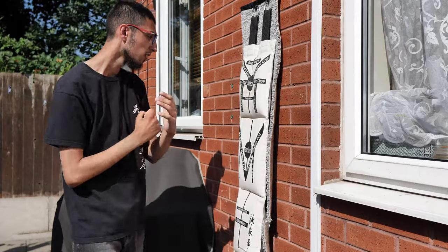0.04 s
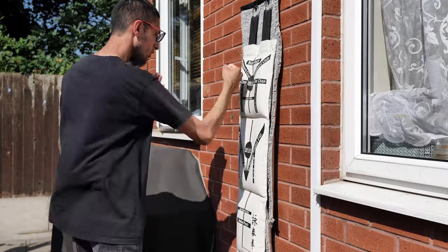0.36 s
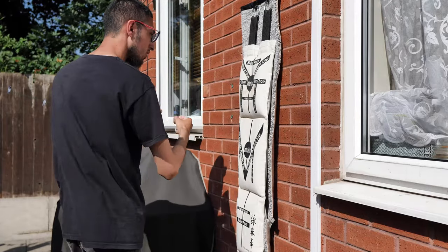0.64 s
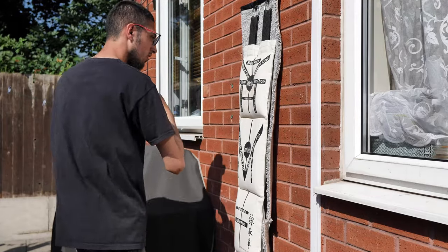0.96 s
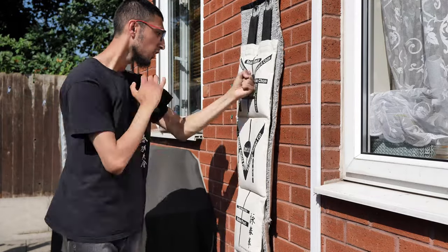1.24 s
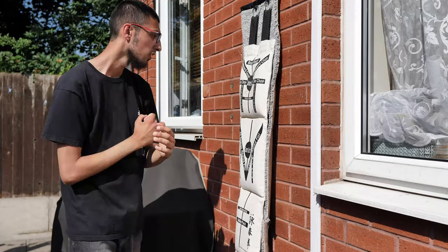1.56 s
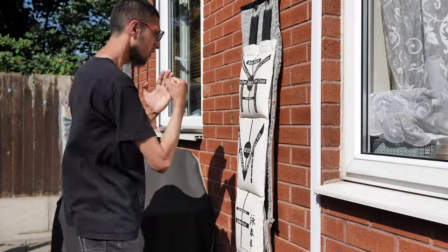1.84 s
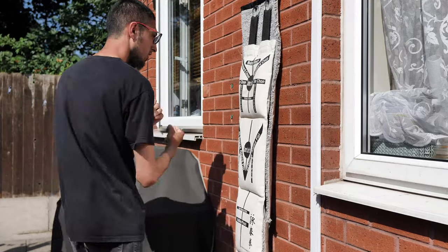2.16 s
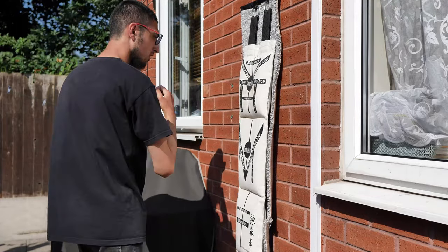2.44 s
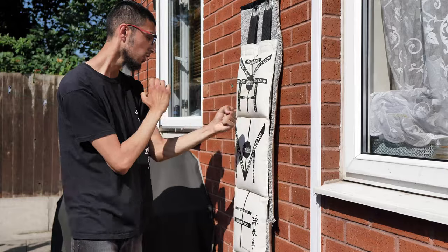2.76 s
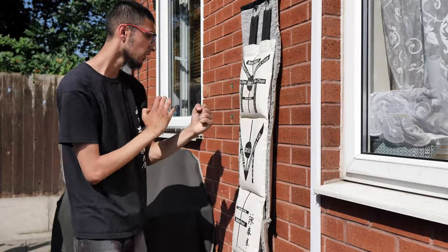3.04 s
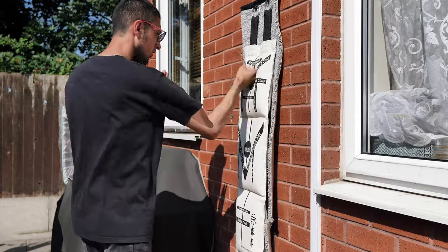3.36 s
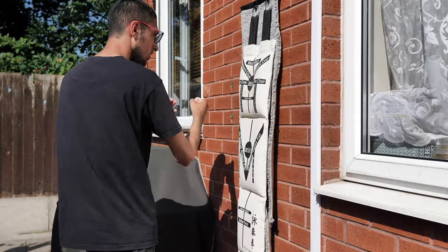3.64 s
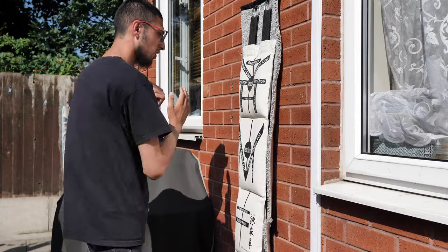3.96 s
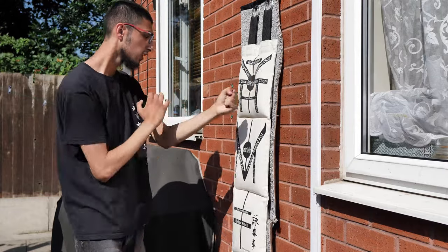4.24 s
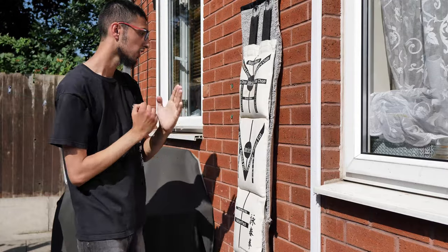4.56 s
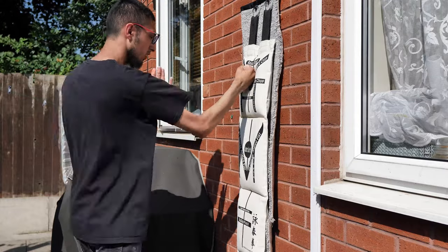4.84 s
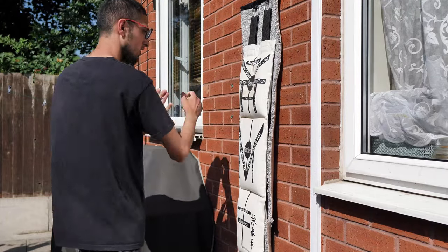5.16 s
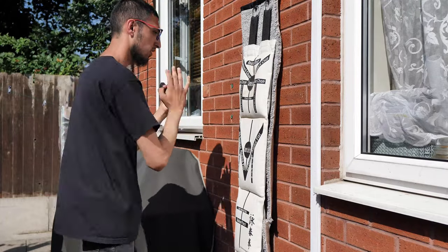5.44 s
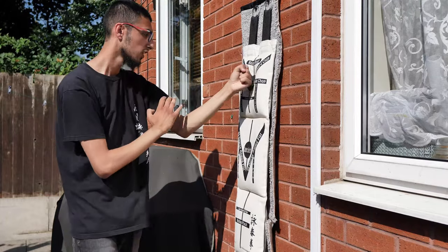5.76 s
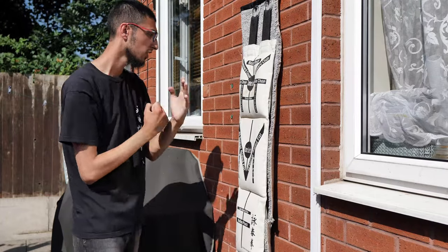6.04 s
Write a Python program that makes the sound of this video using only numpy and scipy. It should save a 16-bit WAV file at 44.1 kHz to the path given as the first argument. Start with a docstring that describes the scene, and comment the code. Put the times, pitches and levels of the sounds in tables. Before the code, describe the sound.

Eight steady, crunchy knocks of fists on a canvas bag against a brick wall, cloth swishing, over a far traffic murmur.

```python
"""A back yard: bare fists land eight slow, even punches on a sand-filled canvas bag fixed to a brick wall.
A sleeve swishes ahead of each blow; the bag knocks, its filling crunches and settles,
the wall booms and the yard answers with dull echoes. Far traffic murmurs throughout,
and its tyre hiss grows towards the end as one car draws near."""
import sys
import numpy as np
from scipy import signal
from scipy.fft import rfft, irfft
from scipy.io import wavfile
from scipy.ndimage import uniform_filter1d

SR = 44100
rng = np.random.default_rng(int(sys.argv[2]) if len(sys.argv) > 2 else 0)


def master_out(mix):
    """Clip the mix to full scale and print it as 16-bit PCM to the path in sys.argv[1]."""
    frames = np.transpose(np.atleast_2d(mix))
    ceiling = np.clip(frames, -1, 1)
    pcm = np.round(ceiling * 32767).astype(np.int16)
    wavfile.write(sys.argv[1], SR, pcm)


N = 273420
TIME = np.arange(N) / SR

# Each fist finds the filling packed differently, which retunes the bag; its upper two resonances
# follow the tautness of the canvas. Each row: impact in seconds; pitch ratios of thud, knock and canvas;
# relative levels in dB of thud, knock, clop, slap, crunch and wall; swing length in seconds;
# swing and pull-back levels in dB.
PUNCHES = [(0.498, 0.95, 1.01, 0.99, -13, -12.5, -43, -19, -11.5, 1.5, .13, -30.5, -43),
           (1.3119, 1.1, 1.05, 1, -13, -8.5, -11.5, -11.5, -14.5, -11, 0.13, -32.5, -55),
           (2.0277, 0.76, 1.05, 1.1, -16.5, -13.5, -20, -11, -14, 0, .11, -30, -38),
           (2.7469, .72, 1.04, 1.12, -17.5, -10.5, -13.5, -16, -14, 3, 0.12, -33.5, -49),
           (3.4671, 1.05, 1.15, 0.921, -11, -10.5, -8, -21, -13.5, 3.5, 0.097, -33.5, -59),
           (4.1999, 0.63, 0.77, 0.975, -16, -17, -20, -12.5, -14, -0.5, 0.15, -33.5, -46.5),
           (4.921, 1.07, 0.98, 0.95, -15.5, -12.5, -16.5, -12, -13, -4, 0.15, -34, -51),
           (5.648, 1.05, 0.93, 0.939, -13, -21, -18.5, -16, -14.5, -5, 0.15, -30.5, -59)]
# Stereo image of close and of distant sounds. Each row: frequency in Hz, left-right likeness (1 is mono).
NEAR_LIKENESS = [(100, 1), (400, 0.99), (1000, 0.91), (3000, 0.84), (8000, 0.89), (13000, 0.68)]
FAR_LIKENESS = [(100, 1), (400, 0.99), (1000, 0.8), (3000, 0.6), (8000, 0.79), (13000, 0.29)]


def bag_knocks():
    """The padding spreads the blow: each resonance swells for a few ms and the sand damps it at once."""
    # Thud, knock, clop and slap. Each row: base pitch in Hz, rise in seconds, delay in seconds.
    resonances = [(266, 0.0026, 0.00048), (430, 0.0023, 0.00071), (762, 0.0021, 0.00084),
                  (1179, 0.0031, 0.0012)]
    out, t = np.zeros(N), TIME[:SR // 10]
    for impact, thud, knock, canvas, *levels_db in PUNCHES:
        tuning = (thud, knock, canvas, canvas)
        for k, (hz, rise, delay) in enumerate(resonances):
            pulse = t / rise * np.exp(1 - t / rise)
            tone = pulse * np.sin(2 * np.pi * hz * tuning[k] * t)
            out += placed(impact + delay, (-1) ** k * from_db(levels_db[k]) * tone)
    return out


def crunch(gain_db, grain_db, lead_s):
    """Knuckles sink in and stop, crushing canvas and sand in one dense, gritty crack."""
    # Colour of the crack. Each row: frequency in Hz, relative level in dB.
    colour = [(100, -16), (250, -6), (600, -5), (1000, 0), (1550, 2), (2200, -8.5), (3200, -10.5),
              (5000, -13), (7000, -22), (9000, -15), (12000, -29.5), (16000, -39)]
    force = 0
    for impact, *_, crunch_db, _wall_db, _swing_s, _swing_db, _back_db in PUNCHES:
        crush = envelope(impact - lead_s, attack_s=0.0041, hold_s=0.0021, t60=0.019)
        force += from_db(crunch_db + gain_db) * crush
    return force * uneven(grain_db, size=20) * noise(colour, NEAR_LIKENESS)


def wall_boom(lag_s, blow_db, rebound_s, rebound_db):
    """The wall booms under the blow and again as the bag drops back against it."""
    # The wall's low modes. Each row: pitch in Hz, relative level in dB, time to fall 60 dB in seconds.
    modes = [(84.8, -53.5, 0.93), (122.2, -33.5, 0.28), (142, -30.5, 0.092), (209, -40.5, 0.2)]
    t = TIME[:SR]
    ring = sum(from_db(db - 60 * t / t60) * np.sin(2 * np.pi * hz * t) for hz, db, t60 in modes)
    boom = ring * np.minimum(t / 0.0082, 1)
    double_boom = placed(lag_s, from_db(blow_db) * boom) + placed(rebound_s, from_db(rebound_db) * boom)
    return sum(placed(impact, from_db(wall_db) * double_boom)
               for impact, *_, wall_db, _swing_s, _swing_db, _back_db in PUNCHES)


def settling_sand(gain_db, grain_db, lag_s):
    """Grains slide back in small clumps as the fist pulls out."""
    # Colour of the sliding filling. Each row: frequency in Hz, relative level in dB.
    colour = [(41, -42), (70, -12), (124, 0.5), (286, -6), (368, 1), (554, -2.5), (711, -1.5), (797, -5),
              (1000, -4), (1410, -14.5), (1810, -17), (2600, -16.5), (9490, -34.5), (12500, -54),
              (16000, -64)]
    flow = sum(envelope(impact + lag_s, attack_s=0.0032, hold_s=0.0034, t60=0.34)
               for impact, *_ in PUNCHES)
    return from_db(gain_db) * flow * uneven(grain_db, size=60) * noise(colour, NEAR_LIKENESS)


def sleeve(press_db, flutter_db, growth_db_per_s):
    """Cloth swishes up as the arm gains speed, rubs as the fist presses in and swishes on the way back."""
    # Colour of the swish. Each row: frequency in Hz, relative level in dB.
    colour = [(150, -20.5), (500, -9.5), (1000, -5), (1480, 1.5), (1950, -4), (2500, -4), (3500, -11),
              (6000, -18.5), (8000, -20.5), (9600, -19), (12000, -25), (16000, -36)]
    attack_s, follow_through_s, pull_back_lag_s = 0.04, 0.048, 0.15
    power = 0
    for impact, *_, swing_s, swing_db, back_db in PUNCHES:
        level_db = np.where(TIME < impact, swing_db + growth_db_per_s * (TIME - impact), press_db)
        hold_s = swing_s - attack_s + follow_through_s
        stroke = from_db(level_db) * envelope(impact - swing_s, attack_s, hold_s, t60=0.28)
        pull_back = from_db(back_db) * swell(impact + pull_back_lag_s, width_s=0.046)
        power += stroke ** 2 + pull_back ** 2
    return np.sqrt(power) * uneven(flutter_db, size=300) * noise(colour, NEAR_LIKENESS)


def canvas_release(level_db, delay_s, width_s):
    """The dented canvas springs back with a bright rasp as the fist leaves."""
    # Colour of the rasp. Each row: frequency in Hz, relative level in dB.
    colour = [(500, -20), (2500, 2), (9500, -4), (16000, -26)]
    release = sum(swell(impact + delay_s, width_s) for impact, *_ in PUNCHES)
    return from_db(level_db) * release * noise(colour, NEAR_LIKENESS)


def cloth_ticks(t60, width_ratio):
    """Fabric gives tiny bright snaps between blows."""
    # Each row: start in seconds, level before filtering in dB, band centre in Hz.
    snaps = [(1.664, -45, 8900), (3.099, -40, 6300), (3.667, -38.5, 8900), (4.318, -37, 9500),
             (5.846, -40, 6000)]
    out, t = np.zeros((2, N)), TIME[:SR // 10]
    for start, db, hz in snaps:
        snap = from_db(db - 60 * t / t60) * rng.standard_normal(len(t))
        out += placed(start, band(snap, hz / width_ratio, hz * width_ratio))
    return out


def yard_echoes(blows, high_cut_hz, tail_db, tail_t60):
    """The yard throws back a few dull echoes, then a faint diffuse tail."""
    # Bounces off fence, ground and house. Each row: delay in seconds, level in dB.
    echoes = [(.0075, -24.5), (0.018, -18), (.036, -22), (.052, -17.5), (0.063, -39.5)]
    dull = band(blows.mean(axis=0), 62, high_cut_hz)
    out = np.zeros((2, N))
    for delay, db in echoes:
        skew_s = rng.uniform(-0.00013, 0.00006)   # nudges the echo to one side
        out += from_db(db) * np.array([placed(delay - skew_s, dull), placed(delay + skew_s, dull)])
    t = TIME[:SR]
    white = noise([(100, 0), (16000, 0)], FAR_LIKENESS)[:, :SR]
    tail = white * from_db(-60 * t / tail_t60) * np.minimum(t / 0.018, 1)
    tail /= np.sqrt(np.sum(tail[0] ** 2))
    return out + from_db(tail_db) * signal.fftconvolve(dull[None], tail, axes=1)[:, :N]


def traffic_murmur(start_db, growth_db_per_s, engine_width_hz):
    """Far roads murmur and slowly thicken; three engines swell out of them."""
    # Colour of the murmur. Each row: frequency in Hz, relative level in dB.
    colour = [(15, -80), (25, -50), (53, -31), (62, -34), (75, -7.5), (200, -4.5), (243, -5), (278, -3),
              (386, 0), (450, -3), (567, -2.5), (662, -8), (850, -6.5), (1540, -12), (2500, -22),
              (3250, -72), (5500, -120)]
    # Far engines. Each row: peak in seconds, pitch in Hz, level in dB, swell width in seconds.
    engines = [(3.92, 477, -49, 0.21), (5.2, 405.4, -50.5, 0.42), (5.88, 382, -47.5, 0.16)]
    murmur = from_db(start_db + growth_db_per_s * TIME) * noise(colour, FAR_LIKENESS)
    drones = sum(from_db(db) * swell(peak_s, width_s) * rough_tone(hz, engine_width_hz)
                 for peak_s, hz, db, width_s in engines)
    return murmur + drones


def tyre_hiss(start_db, growth_db_per_s, car_db, bounce_s, bounce_db):
    """Far tyres hiss louder as one car draws near; the house wall reflects the sound."""
    # Colour of the tyres. Each row: frequency in Hz, relative level in dB.
    colour = [(400, -15), (1000, 1.5), (1700, 1), (2600, 0), (4000, -5.5), (7000, -10), (10000, -14.5),
              (13000, -22), (16000, -32)]
    nearest_s, pass_s = 5.96, 0.46   # pass time is the car's least distance over its speed
    hiss = noise(colour, FAR_LIKENESS)
    bounce = from_db(bounce_db) * np.roll(hiss, round(bounce_s * SR), axis=1)
    roads = from_db(start_db + growth_db_per_s * TIME)
    car = from_db(car_db) / np.hypot(1, (TIME - nearest_s) / pass_s)
    return np.hypot(roads, car) * (hiss + bounce)


def faint_hum():
    """A faint, rough hum grows out of the second punch, wavers and fades."""
    # Bands of the hum. Each row: pitch in Hz, level in dB, width in Hz.
    partials = [(341, -44, 36), (457, -45, 84), (677, -45, 87), (817, -42.5, 42), (847, -43.5, 83)]
    tones = sum(from_db(db) * rough_tone(hz, width_hz) for hz, db, width_hz in partials)
    return envelope(start_s=1.3, attack_s=0.02, hold_s=0.02, t60=2.1) * tones


def from_db(db):
    """Decibels to gain."""
    return 10 ** (np.asarray(db) / 20)


def at_hz(points, hz):
    """Read a table on a log-frequency axis."""
    known_hz, values = np.transpose(points)
    return np.interp(np.log(hz + 1e-9), np.log(known_hz), values)


def noise(colour, likeness):
    """Steady stereo noise of a given colour and left-right likeness; rms 1."""
    hz = np.arange(N // 2 + 1) * SR / N
    mid, side = rfft(rng.standard_normal((2, N))) * from_db(at_hz(colour, hz))
    alike = np.clip(at_hz(likeness, hz), 0, 1)
    out = irfft(np.sqrt(1 + alike) * mid + np.sqrt(1 - alike) * side * [[1], [-1]], N)
    return out / out.std()


def rough_tone(hz, width_hz):
    """A narrow band of noise around a steady pitch; rms 1."""
    low_pass = signal.butter(2, width_hz / 2, fs=SR, output="sos")
    waver = signal.sosfilt(low_pass, rng.standard_normal((2, N)))
    phase = 2 * np.pi * hz * TIME
    return (waver[0] * np.cos(phase) + waver[1] * np.sin(phase)) / waver.std()


def band(x, low_hz, high_hz):
    """Gentle band-pass."""
    band_pass = signal.butter(2, [low_hz, min(high_hz, 0.45 * SR)], "band", fs=SR, output="sos")
    return signal.sosfilt(band_pass, x + 1e-18)


def placed(start_s, x):
    """A sound set at its time on an empty track."""
    return np.pad(x, (max(round(start_s * SR), 0), N))[:N]


def envelope(start_s, attack_s, hold_s, t60):
    """Gain that rises evenly to 1, holds, then falls 60 dB in t60 seconds."""
    t = TIME - start_s
    return np.clip(t / attack_s, 0, 1) * from_db(-60 * np.clip((t - attack_s - hold_s) / t60, 0, 2))


def swell(centre_s, width_s):
    """A smooth rise and fall of height 1."""
    return np.exp(-((TIME - centre_s) / width_s) ** 2)


def uneven(depth_db, size):
    """A random gain that changes over about size samples."""
    lumps = uniform_filter1d(rng.standard_normal(N), size=size)
    return from_db(depth_db * lumps / lumps.std())


def scene():
    """The bag close by, the yard around it, traffic far off."""
    blows = bag_knocks() + crunch(gain_db=0.76, grain_db=2.0, lead_s=0.0012)
    body = wall_boom(lag_s=0.0023, blow_db=0.5, rebound_s=0.054, rebound_db=-0.5)
    sand = settling_sand(gain_db=-23.5, grain_db=2.5, lag_s=0.0049)
    cloth = sleeve(press_db=-32.5, flutter_db=1.5, growth_db_per_s=83)
    cloth += canvas_release(level_db=-45, delay_s=0.07, width_s=0.028)
    cloth += cloth_ticks(t60=0.037, width_ratio=1.24)
    yard = yard_echoes(blows, high_cut_hz=7200, tail_db=-20, tail_t60=0.72)
    near = (blows + body + sand + cloth + yard) * from_db([[0.16], [-0.16]])   # a hair to the left
    traffic = traffic_murmur(start_db=-46.5, growth_db_per_s=0.41, engine_width_hz=67)
    traffic += tyre_hiss(start_db=-53, growth_db_per_s=0.91, car_db=-46, bounce_s=0.001656, bounce_db=-15)
    return near + traffic + faint_hum()


def record(dry):
    """The microphone sheds deep bass, peaks clip just under full scale, the top is cut."""
    low_cut_hz, high_cut_hz = 80, 16000
    thin = signal.sosfilt(signal.butter(4, low_cut_hz, "high", fs=SR, output="sos"), dry)
    clipped = np.clip(thin, -0.95, 0.95)
    return signal.sosfilt(signal.ellip(10, 0.2, 90, high_cut_hz, fs=SR, output="sos"), clipped)


dry = scene()
out = record(dry)
master_out(out)
```